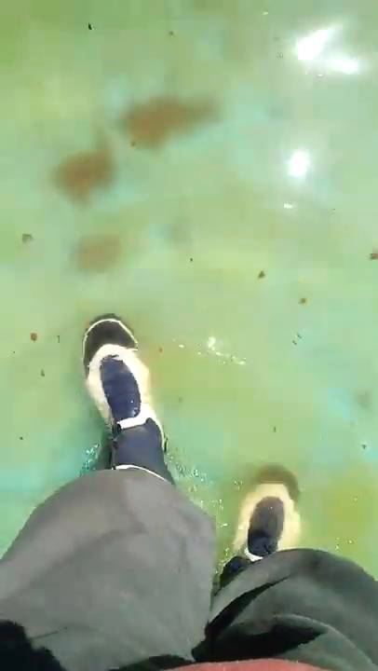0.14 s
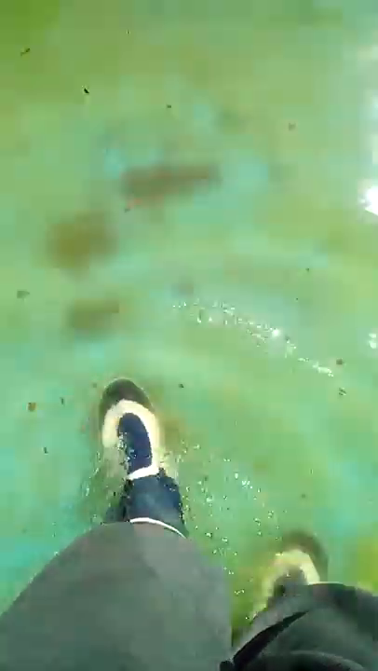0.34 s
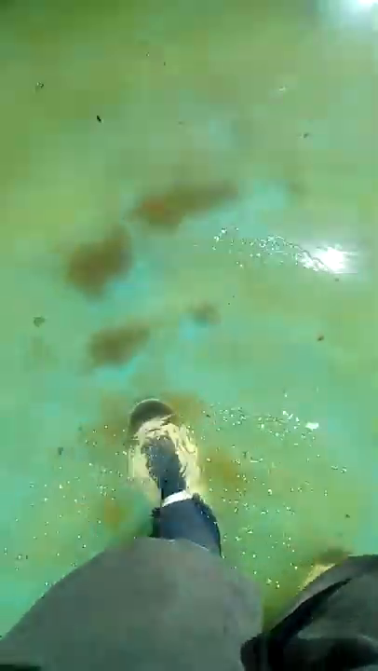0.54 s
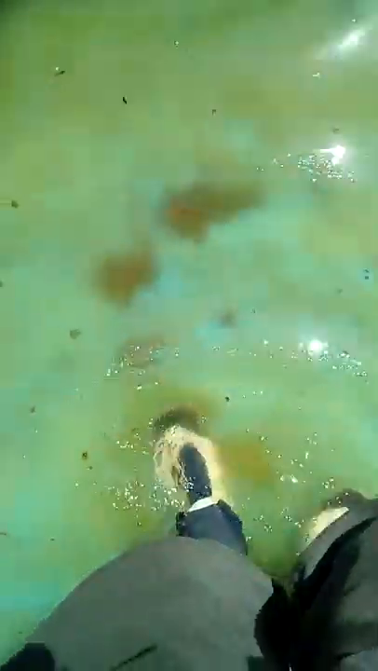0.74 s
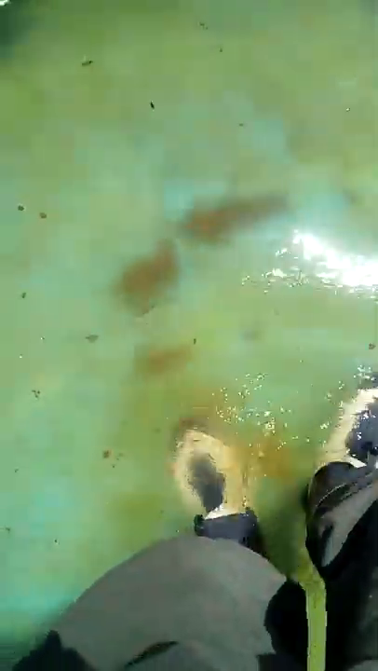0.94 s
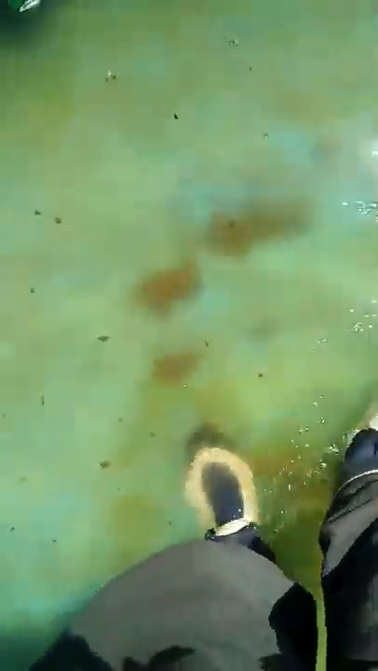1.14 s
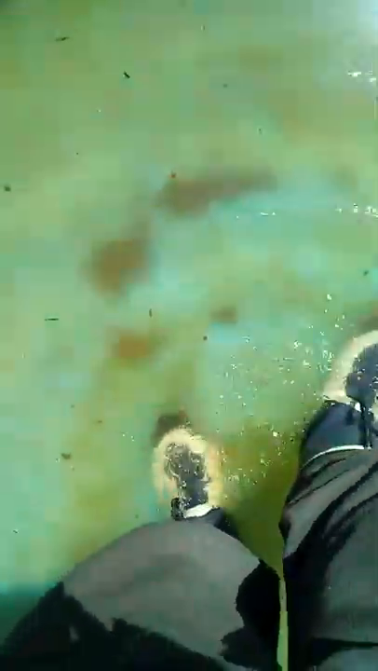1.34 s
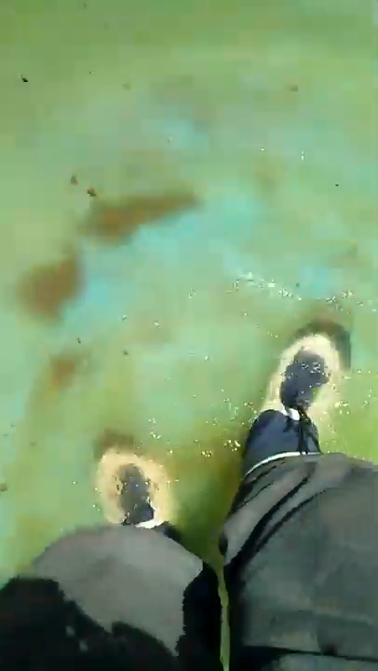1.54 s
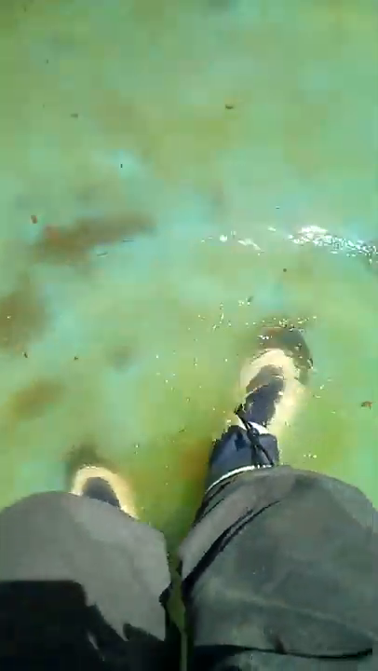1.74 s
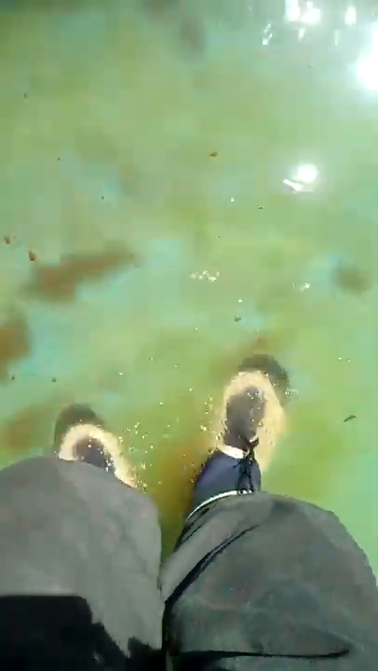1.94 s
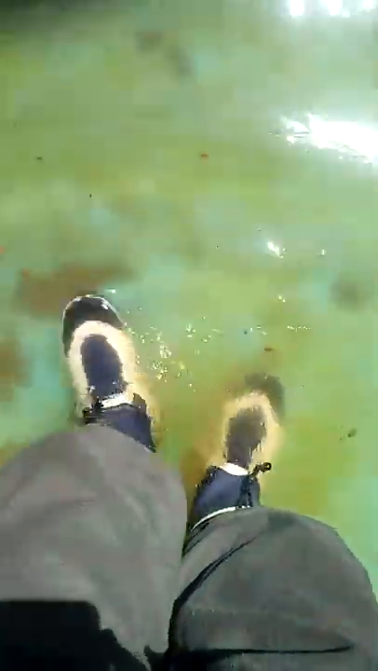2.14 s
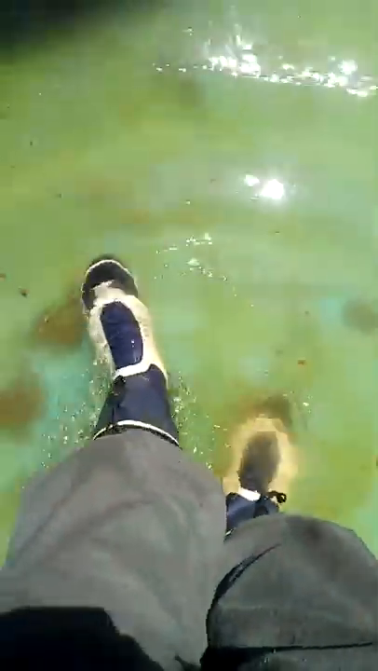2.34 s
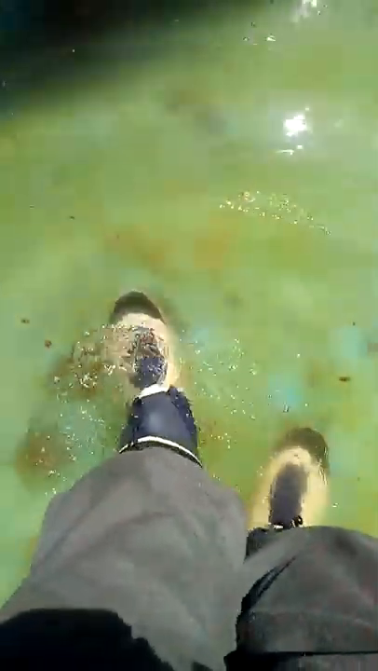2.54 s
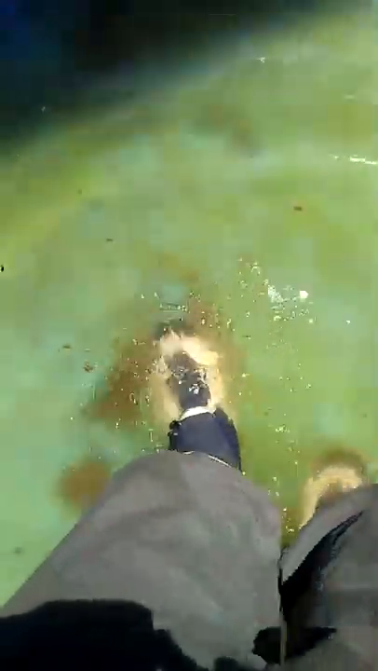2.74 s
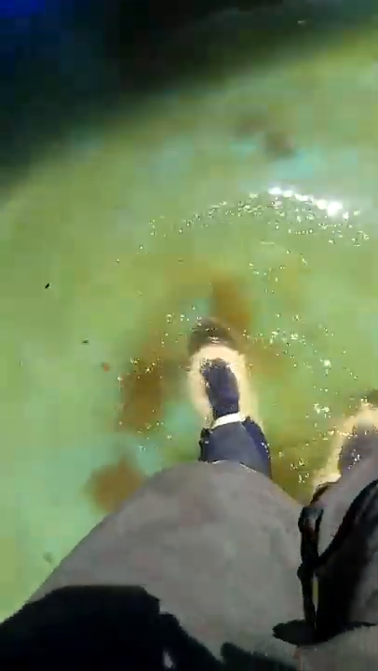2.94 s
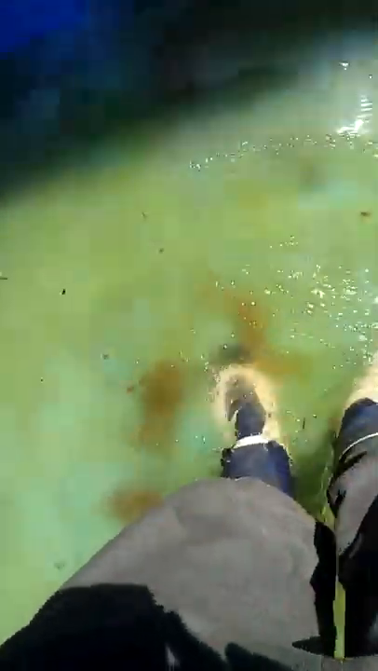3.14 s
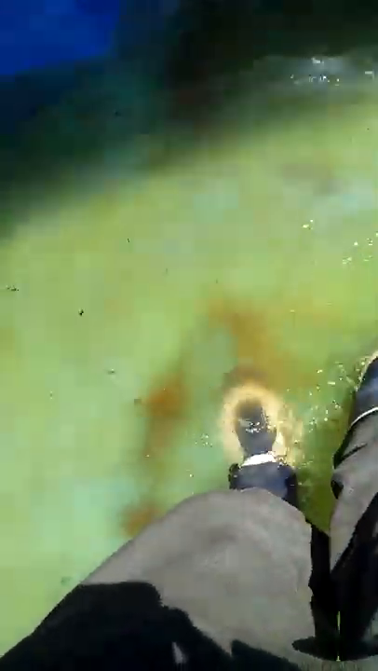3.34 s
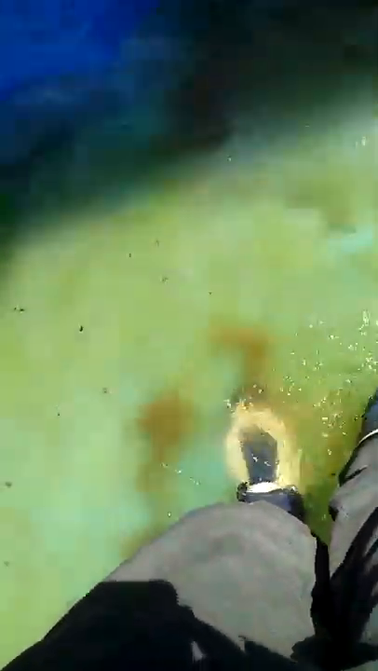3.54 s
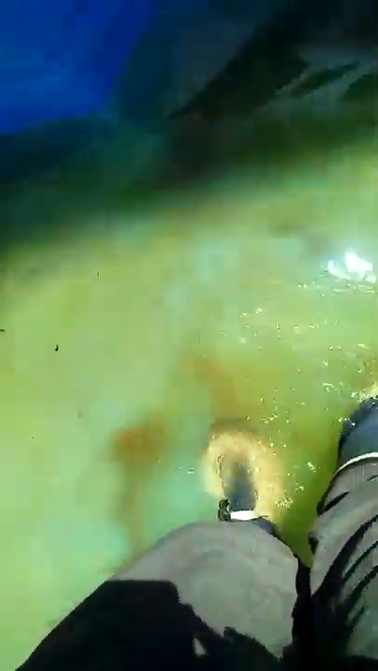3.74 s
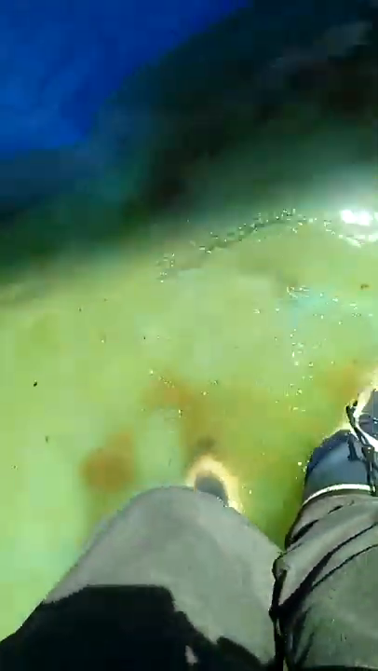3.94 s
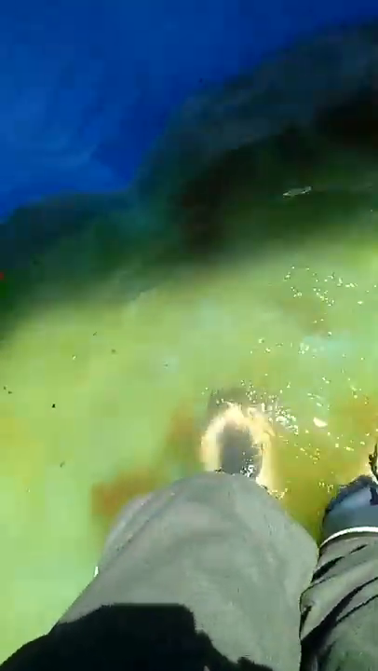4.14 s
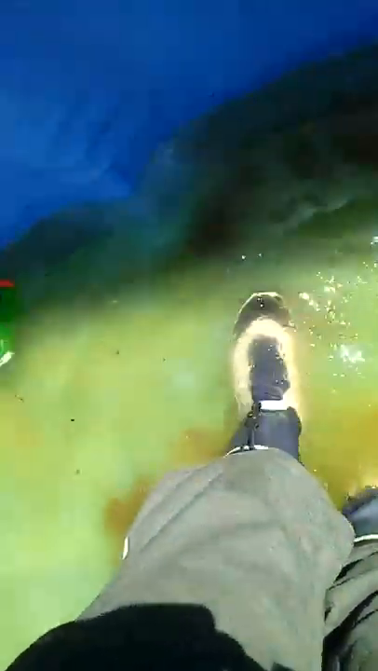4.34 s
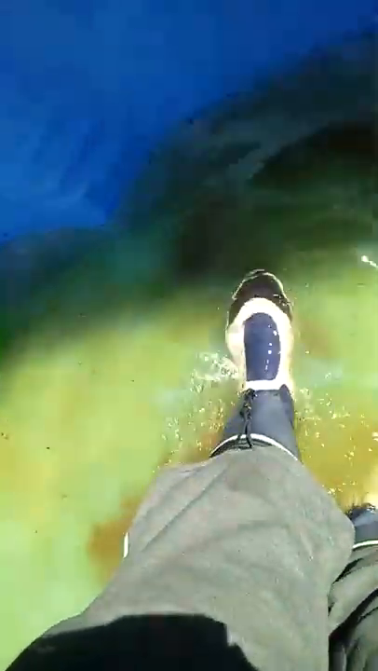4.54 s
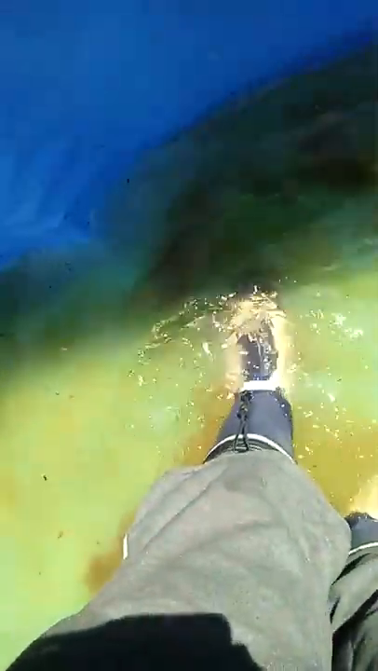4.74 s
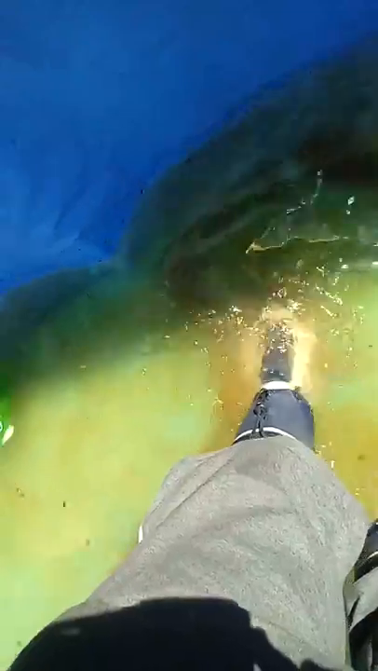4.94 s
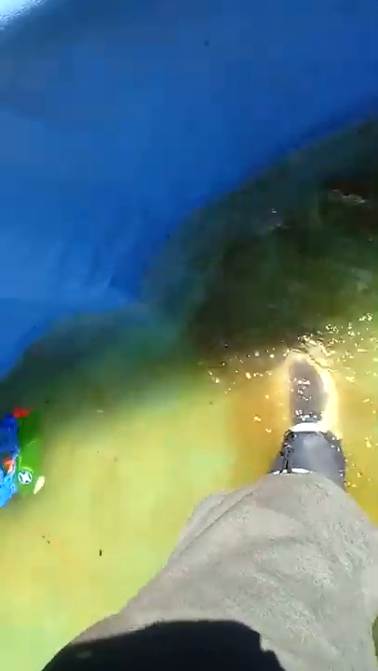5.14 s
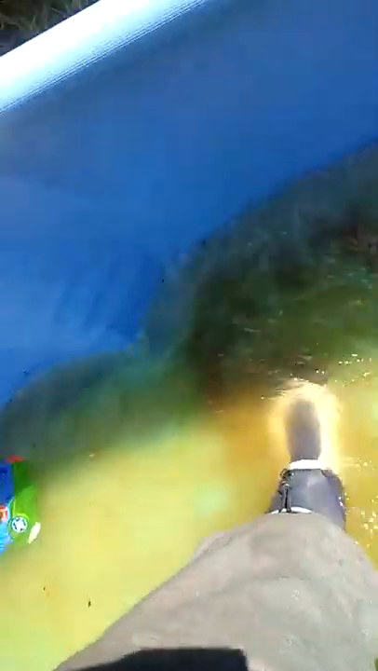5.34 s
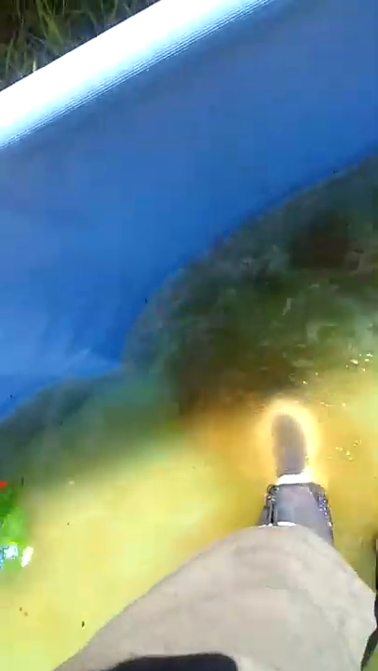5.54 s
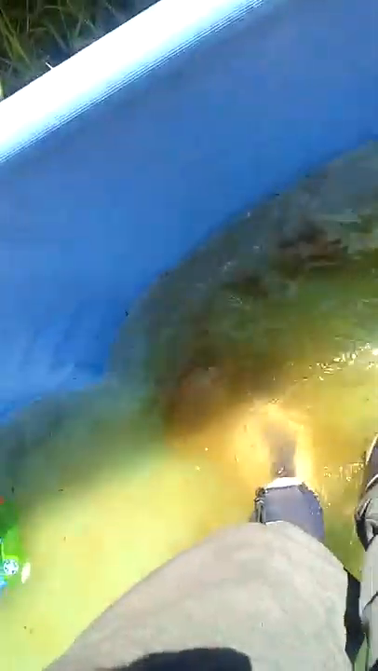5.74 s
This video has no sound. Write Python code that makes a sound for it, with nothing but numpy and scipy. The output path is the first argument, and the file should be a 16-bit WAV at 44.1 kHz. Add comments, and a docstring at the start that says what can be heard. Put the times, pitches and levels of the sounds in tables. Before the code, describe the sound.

Slow, uneven steps slosh through a shallow paddling pool, bubbling and splashing lightly over a faint outdoor hum.

```python
"""Rubber boots wade through a shallow paddling pool, heard from a small microphone held above them.
From the first step, trapped air rings: distinct bubbles one by one over a churn of fainter ones, while
droplets tick and wet cloth and water swish. Near 1.5 s comes a lull with a faint, narrow hiss.
The steps resume at 2.1 s, a sharp knock falls at 2.8 s, and the wading dies down after 5.3 s before a
last push. A quiet outdoor hum and the hiss of the microphone lie under it all."""
import sys
import numpy as np
from scipy import signal
from scipy.io import wavfile
from scipy.ndimage import uniform_filter1d

SR = 44100
rng = np.random.default_rng(int(sys.argv[2]) if len(sys.argv) > 2 else 0)


def wav_record(signal):
    """Record a signal, one row per channel, as 16-bit PCM in the file named by sys.argv[1]."""
    frames = np.transpose(np.atleast_2d(signal))
    bounded = np.clip(frames, -1, 1)
    # unit amplitude maps onto the largest positive 16-bit level
    quanta = np.round(bounded * 32767).astype(np.int16)
    wavfile.write(sys.argv[1], SR, quanta)


N = 259308

# colour of stirred water as heard through the small microphone's resonances: frequency_hz, relative_db
HEARD_COLOUR = [(200, -37.5), (560, -13.5), (760, 1), (1300, 1), (1550, -1.5), (2900, -12.5), (3900, -13.5),
                (4600, -16.5), (5600, -17), (6500, -17), (7300, -23), (8200, -45.5), (9900, -42.5),
                (12200, -62.5), (15300, -48)]


def ring(hz, length_s, rise, swell_s):
    """Damped oscillation: it swells, falls 60 dB in length_s and glides by the fraction rise."""
    t = np.arange(int(np.clip(length_s, 1e-3, .3) * SR)) / SR
    envelope = (1 - np.exp(-(t / swell_s) ** 2)) * gain_of(-60 * (t / length_s) ** 1.6)
    return envelope * np.sin(2 * np.pi * hz * t * (1 + rise * t / (2 * length_s)))


def loud_bubbles():
    """Minnaert resonance: trapped air is a spring, water its mass; the moving surface adds flutter."""
    # distinct bubbles: start_s, pitch_hz, level_db, swell_ms, length_ms, rise_fraction
    bubbles = [(0.0549, 1905, -37, 1.6, 35, 0.0), (0.1156, 1220, -27, 1, 7.8, 0.11),
               (0.138, 1080, -36.5, 1.6, 41, -0.039), (0.185, 1184, -29.5, 1.8, 49, 0.03),
               (0.2, 1460, -31, 3.5, 33, 0.049), (0.2098, 4030, -40, 0.83, 31, 0.3),
               (0.3146, 1396, -43, 0.94, 45, -0.08), (0.4715, 1700, -29, 0.37, 28, 0.016),
               (0.4766, 3750, -26, 0.4, 11, -0.1), (0.481, 1380, -27.5, 0.42, 15, -0.2),
               (0.4867, 1414, -29, 0.66, 40, -0.23), (0.6382, 1336, -26, 5.4, 19, 0.14),
               (0.9636, 1630, -41.5, 3.7, 64, -0.31), (1.0283, 477, -49.5, 2.3, 110, 0.067),
               (1.0285, 1470, -25.5, 2, 26, 0.0), (1.0661, 1560, -21, 3.7, 9.1, 0.2),
               (1.0756, 522, -49, 0.4, 100, -0.066), (1.0737, 1424, -24, 3.1, 13, 0.083),
               (1.121, 1314, -25.5, 0.97, 19, -0.035), (1.1755, 1290, -28, 1.8, 14, 0.0),
               (1.2004, 1319, -25.5, 1, 48, 0.18), (1.2039, 1050, -12.5, 2.3, 6.7, 0.42),
               (1.2134, 607, -40, 3.7, 55, -0.044), (1.2152, 1316, -21.5, 3.4, 24, -0.022),
               (1.227, 787, -39, 2.5, 61, -0.07), (1.2485, 1440, -22, 2.3, 8.5, 0.0),
               (1.2699, 606, -27, 8.4, 24, -0.085), (1.09, 1650, -28.5, 0.54, 9.8, -0.15),
               (1.185, 1715, -36, 2.9, 37, 0.04), (1.4029, 5599, -35.5, 4.5, 20, 0.08),
               (1.2771, 1373, -17.5, 7.1, 21.2, 0.0), (1.2893, 598, -35, 6.9, 60, 0.067),
               (2.1885, 1100, -23.5, 6.7, 44, 0.0), (2.2342, 1273, -26.5, 10.5, 28, 0.039),
               (2.2762, 605, -29, 11.5, 31, -0.03), (2.292, 644, -37, 1.2, 66, -0.02),
               (2.3101, 985, -36.5, 1.1, 190, -0.033), (2.3172, 1056, -17, 6.4, 19.3, 0.04),
               (2.3288, 1510, -31, 1.2, 51, -0.2), (2.3692, 1430, -20, 1.45, 9.6, 0.16),
               (2.3752, 980, -21.5, 4.8, 20, -0.0022), (2.4055, 2580, -29, 7.3, 21, 0.073),
               (2.4163, 1030, -25, 1.1, 6.4, 0.098), (2.4284, 5070, -24.5, 0.9, 4.3, 0.02),
               (2.4428, 656, -30, 3, 20, 0.06), (2.4469, 1750, -24, 1.2, 12.4, 0.015),
               (2.4499, 1129, -24, 1.5, 12, 0.05), (2.4564, 1030, -21, 5.7, 24, -0.11),
               (2.4683, 789, -30.5, 0.92, 50, -0.088), (2.4848, 867, -40, 3.3, 94, -0.03),
               (2.4984, 1305, -31.5, 2.3, 32, -0.022), (2.5316, 2770, -37, 4.4, 27, -0.011),
               (2.5838, 833, -36.5, 6, 54, -0.11), (2.6179, 2164, -21, 3.4, 8.9, 0.13),
               (2.6304, 911, -42, 0.72, 110, -0.07), (2.64, 818, -36.5, 1.6, 72, 0.073),
               (2.6581, 940, -19.5, 8.8, 21, 0.016), (2.6672, 914, -35, 4.9, 48, 0.02),
               (2.6947, 3750, -31.5, 3.6, 17, 0.02), (2.6954, 1688, -23.5, 3.9, 11, -0.08),
               (2.7224, 1170, -19, 12, 30, 0.34), (2.7619, 4070, -29.5, 0.84, 7.1, 0.034),
               (2.7743, 1017, -19, 12.4, 40, -0.066), (2.7938, 1023, -32.5, 5.5, 57, 0.028),
               (2.8325, 1840, -29.5, 7.8, 41, 0.01), (3.038, 2900, -42, 1.5, 15, 0.0),
               (3.091, 3500, -42, 1, 15, 0.0), (3.1058, 2850, -25.5, 1.5, 4.4, -0.013),
               (3.205, 1250, -38, 5, 30, 0.3), (3.2742, 1306, -22.5, 7.1, 21, -0.039),
               (3.2871, 1750, -36, 1.1, 36, 0.0058), (3.338, 1277, -35, 3.2, 60, -0.094),
               (3.3514, 477, -49, 1, 72, -0.16), (3.3518, 1670, -20, 4.3, 12, 0.14),
               (3.3582, 2200, -28.5, 1.7, 14, -0.072), (3.3829, 1940, -20, 1.5, 6, -0.05),
               (3.3993, 1015, -32, 0.88, 29, 0.068), (3.4004, 6566, -26, 2.2, 6.1, 0.07),
               (3.4752, 5986, -27.5, 4.6, 10.4, 0.06), (3.4082, 992, -17, 9.6, 28, 0.17),
               (3.4249, 486, -40, 4.7, 48, -0.028), (3.4302, 1343, -12.5, 6.5, 19, 0.069),
               (3.4397, 967, -29, 0.3, 44, -0.06), (3.4496, 1284, -31.5, 1.2, 28, 0.04),
               (3.4533, 836, -30, 1.2, 15, 0.04), (3.5181, 2890, -25.5, 2.1, 9.1, -0.01),
               (3.5685, 5940, -21, 2.4, 6.3, -0.037), (3.5895, 1295, -19, 5.8, 21, 0.084),
               (3.5959, 1220, -13, 3.4, 11.6, 0.14), (3.6655, 2090, -20.5, 3.6, 10.7, 0.092),
               (3.6693, 962, -29, 0.24, 72, -0.024), (3.6885, 958, -20, 11, 25, 0.03),
               (3.7267, 1750, -28.5, 4.6, 18, 0.08), (3.7809, 1830, -28.5, 2.7, 10, -0.04),
               (3.8091, 642, -38.5, 3.4, 60, -0.052), (3.8301, 712, -37.5, 8.6, 48, 0.11),
               (3.8442, 4960, -32, 4.5, 14, 0.014), (3.8632, 735, -26, 5, 12, 0.18),
               (3.8907, 1760, -36, 2, 14, 0.03), (4.4455, 1145, -39, 0.5, 22, 0.069),
               (4.4512, 3590, -39.5, 1.8, 21, -0.04), (4.5096, 3550, -31.5, 3.1, 13, 0.0),
               (4.5229, 6580, -19, 1.46, 6, -0.02), (4.524, 3050, -26.5, 3.8, 11.6, -0.07),
               (4.533, 949, -36.5, 0.44, 68, 0.32), (4.5452, 1108, -29.5, 4.0, 27, -0.09),
               (4.5548, 3627, -10.5, 1.02, 2.97, 0.018), (4.579, 3930, -20.5, 1.8, 6.1, -0.03),
               (4.5811, 1910, -22, 4.4, 13.5, -0.059), (4.644, 1620, -31.5, 1.2, 14, -0.036),
               (4.6542, 1035, -14.5, 6, 19.4, 0.1), (4.6835, 608, -27.5, 24, 72, 0.22),
               (4.6918, 795, -29.5, 0.95, 38, 0.14), (4.6984, 2940, -33.5, 4.2, 21, 0.03),
               (4.7003, 1000, -14.5, 5.4, 11.2, 0.033), (4.7472, 3270, -17.5, 3.3, 11.3, 0.063),
               (4.7964, 1480, -15.6, 7.3, 20, 0.12), (4.7979, 1136, -28, 0.97, 35, 0.023),
               (4.8076, 1444, -23.5, 1.4, 26, 0.12), (4.8197, 1105, -21.5, 0.89, 13, -0.47),
               (4.8197, 3678, -25, 1, 7, 0.0), (4.8496, 1520, -8.5, 2.5, 9.6, 0.028),
               (4.8536, 1060, -17.5, 1.2, 12.7, -0.19), (4.8586, 1350, -24, 0.19, 18, 0.07),
               (4.8629, 491, -41, 0.63, 76, 0.01), (4.9077, 1820, -29.5, 2.2, 21, 0.0096),
               (4.9443, 1187, -44, 0.8, 65, 0.07), (4.9749, 1225, -17.5, 4.8, 12, 0.027),
               (4.9808, 1479, -28.5, 5.2, 18, 0.0), (5.0215, 1212, -38.5, 2.7, 23, -0.13),
               (5.1085, 6940, -26, 2.7, 6.1, -0.062), (5.121, 1956, -33, 1.3, 37, -0.049),
               (5.1228, 3810, -19, 1.7, 6.2, 0.07), (5.1272, 2350, -22.9, 3.2, 11, 0.1),
               (5.1471, 1950, -32.5, 0.72, 17, -0.02), (5.1563, 3380, -23, 2.2, 6.5, -0.046),
               (5.1577, 920, -20, 5.4, 22.6, 0.0078), (5.1693, 1008, -35, 2.9, 50, 0.0),
               (5.2567, 3140, -42, 0.3, 14, 0.0), (5.2704, 3520, -47, 0.78, 35, 0.059),
               (5.4019, 6740, -23.5, 1.44, 5.2, -0.2), (5.412, 2105, -51, 2, 39, 0.014),
               (5.8134, 1680, -40, 1.84, 24, -0.089), (5.8493, 354, -49, 1.1, 52, 0.32),
               (5.8508, 1660, -34.5, 3.7, 32, 0.018)]
    out = np.zeros(N)
    for start_s, hz, db, swell_ms, length_ms, rise in bubbles:
        add(out, start_s, gain_of(db) * ring(hz, length_ms / 1000, rise, swell_ms / 1000))
    return out * (1 + .34 * fluctuation(samples=90))


def bubble_crowd(db, low_hz, high_hz, cycles, per_s, spread_db, swish_share, pitches=40):
    """Incoherent addition: faint bubbles at random times and a smooth swish sum in power in one band."""
    calm_db = 22.5  # this far below the peak level only swish remains
    activity = np.clip(1 + (db - db.max()) / calm_db, 0, 1)
    births = impulses(activity * per_s, spread_db, cap=4) * gain_of(db)
    pitch_index = rng.integers(0, pitches, N)
    ringing = np.zeros(N)
    for k, hz in enumerate(np.geomspace(low_hz, high_hz, pitches)):
        stretch, rise, softness = rng.random(3)
        length_s = cycles * (.5 + 2 * stretch) / hz
        bubble = ring(hz, length_s, .5 * rise, length_s * (.024 + .2 * softness))
        weight = gain_of(level_at(HEARD_COLOUR, hz)) * np.sqrt(hz) / np.linalg.norm(bubble)
        ringing += signal.oaconvolve(births * (pitch_index == k), weight * bubble)[:N]
    ringing *= np.linalg.norm(gain_of(db) * np.sqrt(activity)) / np.linalg.norm(ringing)
    swish = gain_of(db) * noise(HEARD_COLOUR, low_hz, high_hz)
    bubble_share = 1 - swish_share
    return np.sqrt(bubble_share) * ringing + np.sqrt(1 - bubble_share * activity) * swish


def stirring_db():
    """Powers add: boot pushes over still ripples set the gurgle, slosh, trickle and spray levels."""
    # pushes of a boot, fading 30 dB in fade_s (a negative fade holds to the end):
    # start_s, rise_s, hold_s, fade_s, gurgle_db, slosh_db, trickle_db, spray_db
    pushes = [(0.0, .03, .04, .1, -56, -75, -56, -66), (0.03, .06, .21, .3, -48, -63.5, -58.5, -67.5),
              (0.449, 0.024, 0.071, 0.18, -51, -72, -55, -59.5),
              (0.862, 0.028, .04, 0.3, -61, -76, -66.5, -90),
              (0.938, 0.075, 0.13, 0.48, -47.5, -66, -54.5, -61),
              (1.137, 0.043, 0.088, 0.226, -41.5, -59, -50.5, -58),
              (1.316, 0.022, 0.14, .1, -58, -71.5, -67, -61),
              (2.099, .1, .15, 1.2, -52.5, -57.5, -69, -62.5), (2.26, .03, .1, .1, -60, -70, -62, -64),
              (2.35, .07, .11, 0.29, -41.5, -54.5, -48, -53),
              (2.558, 0.029, 0.19, .15, -46, -66.5, -62, -61),
              (2.8, .03, 0.055, 0.13, -52.5, -63, -78, -76),
              (3.049, 0.038, 0.15, 0.4, -54.5, -72, -61.5, -77),
              (3.253, 0.098, 0.099, 0.25, -42.5, -57, -55, -56),
              (3.492, 0.064, 0.13, 0.33, -46.5, -73, -52, -57),
              (3.735, 0.036, .17, .12, -53, -63.5, -58, -67.5),
              (4.212, 0.067, 0.16, 1, -68.5, -73, -77, -68),
              (4.434, 0.081, 0.094, 0.28, -50, -66, -51.5, -55),
              (4.619, 0.039, 0.097, 0.1, -50.5, -56.5, -56, -60),
              (4.779, 0.017, 0.061, 0.18, -45.5, -58, -48.5, -58.5),
              (4.88, .02, 0.091, 0.02, -52, -60, -62, -66.5),
              (5.09, 0.023, 0.17, 0.18, -57, -67, -57, -67.5),
              (5.783, 0.044, .1, -7, -52.5, -63, -58.5, -90)]
    # ripples between steps: gurgle_db, slosh_db, trickle_db, spray_db
    ripples = (-64, -72, -72, -79)
    t = np.arange(0, N / SR + .01, .005)
    power = np.outer(gain_of(ripples) ** 2, np.ones(len(t)))
    for start, rise, hold, fade, *levels_db in pushes:
        rising = 1 - (t - start) / rise
        fading = (t - start - rise - hold) / fade
        below_db = 30 * np.maximum(0, np.maximum(rising, fading))
        power += gain_of(np.array(levels_db)[:, None] - below_db) ** 2
    return [np.interp(np.arange(N) / SR, t, 10 * np.log10(band)) for band in power]


def churn():
    """Pitch varies inversely with radius: as bubble sizes drift, so do the peaks of trickle and spray."""
    # gurgle, slosh, trickle, spray and mist:
    # low_hz, high_hz, ring_cycles, peak_bubbles_per_s, spread_db, swish_share
    crowds = [(603.5, 2200, 18.8, 500, 3.5, 0.5), (360, 620, 16.4, 150, 1, 0.61),
              (2200, 4800, 8, 600, 4.5, 0.55), (4560, 8200, 8, 500, 4.5, 0.45),
              (8170, 12000, 7, 300, 4, 0.3)]
    # pitch of the prevailing bubble size: time_s, trickle_hz, spray_hz
    peaks = [(0.0, 3030, 6400), (0.15, 2200, 5500), (0.2, 3700, 5840), (0.39, 2270, 6090),
             (0.46, 3840, 5840), (0.65, 2800, 5340), (1.23, 2710, 5930), (1.37, 3340, 5680),
             (1.64, 2250, 5480), (2.47, 2910, 5820), (2.65, 2410, 6380), (2.69, 3750, 5620),
             (2.8, 3970, 4980), (2.85, 2510, 5760), (3.19, 3500, 5210), (3.34, 2250, 6860),
             (3.49, 2830, 5930), (3.96, 2460, 6040), (4.08, 3130, 5430), (4.32, 2570, 6360),
             (4.47, 3520, 6210), (4.77, 3250, 5570), (4.96, 2260, 5600), (5.29, 3460, 5910),
             (5.4, 2380, 6110), (5.88, 2900, 5220)]
    gurgle_db, slosh_db, trickle_db, spray_db = stirring_db()
    mist_db = -77.5 + .6 * (spray_db - spray_db.max())
    levels = (gurgle_db, slosh_db, trickle_db, spray_db, mist_db)
    gurgle, slosh, trickle, spray, mist = (bubble_crowd(db, *row) for db, row in zip(levels, crowds))
    times, trickle_hz, spray_hz = np.transpose(peaks)
    treble = mist
    for band, peak_hz, width_hz in ((trickle, trickle_hz, 680), (spray, spray_hz, 540)):
        centre_hz = np.interp(np.arange(N) / SR, times, peak_hz)
        treble = treble + .5 * band + gain_of(-1.5) * resonate(band, centre_hz, width_hz)
    flicker_db = 2.2 * fluctuation(samples=200)  # spatter makes the whole treble flicker together
    return gurgle + slosh + unit_rms(gain_of(flicker_db)) * treble


def droplet_ticks():
    """A brief pulse has a broad spectrum: a droplet bursts or lands as a puff of noise in faint spray."""
    # single droplets: time_s, treble_db, lower_re_treble_db, top_re_treble_db
    droplets = [(0.0203, -54, 1.5, -29), (0.062, -65, 9, -17), (0.339, -73.5, 18, -9),
                (0.482, -53.5, 14.5, -22), (0.5078, -69, 25, -12), (0.6136, -73, 9, -19),
                (1.0065, -67, 11, -22), (1.0566, -62, 9, -34), (1.2159, -67, 15, -11),
                (1.346, -55, 9.5, -16), (1.354, -64, 6, 1), (1.388, -59, 4, -12), (2.1764, -53, -6, -32),
                (2.386, -60, -2, -14), (2.4224, -56, 10, -15), (2.4515, -73, 35, -9), (2.5068, -63, 9, -21),
                (2.5877, -59, 17, -30), (2.65, -61, 7, -13), (2.729, -56, 0, -27), (2.7716, -68, 23, 7),
                (2.8726, -70, 0, -18), (2.8965, -70, 8, -18), (3.0085, -72, 12, -10),
                (2.9584, -66, -17, -19.5), (3.0245, -52.5, 6.5, -5), (3.3032, -53.5, 0.5, -23),
                (3.3124, -66, -1, -10), (3.343, -55, -17, -32), (3.361, -56, 4, -19),
                (3.4483, -53.5, 10, -28), (3.5215, -49, 0, -22), (3.5554, -58, -3, -18),
                (3.5932, -61, 6, -26), (3.6308, -46, -4, -46), (3.645, -50, -12, -45),
                (3.805, -60, -19.5, -28), (3.8477, -56, 2.5, -37), (3.915, -66, -4, -9),
                (4.4012, -71, 15, -2), (4.5248, -47.5, 14, -24), (4.5399, -59, 18.5, -12),
                (4.6268, -57.5, 18.5, -11), (4.6415, -57, 20, -12), (4.748, -56.5, 12, -20),
                (4.8172, -49, 12.5, -3), (4.823, -57, 14, -11), (5.1098, -57, 20, -2),
                (5.1242, -48, 14.5, -10), (5.1527, -57.5, 3, -6), (5.232, -70, -0.5, -16),
                (5.3396, -71, 8, 3.5)]
    # treble, lower and top bands of a tick: low_hz, high_hz
    bands = [(7500, 12000), (3000, 7500), (12000, 15800)]
    hisses = [noise(HEARD_COLOUR, *edges) for edges in bands]
    t = np.arange(-600, 1000) / SR
    spray = gain_of(-14) * np.where(t < 0, np.exp(t / .004), np.exp(-t / .006))
    envelope = np.exp(-(t / .0012) ** 2) + spray
    envelope_rms = np.sqrt(np.mean(envelope ** 2))
    out = np.zeros(N)
    for time_s, treble_db, lower_db, top_db in droplets:
        span = np.round((time_s + t) * SR).astype(int) % N
        for offset_db, hiss in zip((0, lower_db, top_db), hisses):
            puff = envelope_rms * unit_rms(envelope * hiss[span])
            add(out, time_s + t[0], gain_of(treble_db + offset_db) * puff)
    return out


def spatter():
    """Shot noise: tiny droplets fall at random, each a blink of treble, louder when the spray is."""
    # colour of the fine spatter: frequency_hz, relative_db
    spectrum = [(1800, -16), (3000, -1), (5000, -2), (7000, -7), (8500, -20), (11000, -26), (13000, -45),
                (16000, -45)]
    impacts = impulses(per_s=70, spread_db=4, cap=3)
    t = np.arange(-200, 600) / SR
    blink = np.exp(-(t / .0012) ** 2) + .15 * (t > 0) * np.exp(-abs(t) / .004)
    drops = unit_rms(signal.oaconvolve(impacts, blink, "same") * noise(spectrum, low_hz=1500))
    spray_db = stirring_db()[-1]
    return gain_of(-65 + .85 * (spray_db - spray_db.max())) * drops


def reflections(x, level_db=-10, t60_s=.045):
    """Early reflections: the water surface and pool wall return delayed copies that die away fast."""
    delays = np.arange(80, 4000, 20) + rng.integers(0, 20, 196)
    response = np.zeros(4096)
    response[delays] = rng.choice([-1., 1.], len(delays)) * gain_of(-60 * delays / SR / t60_s)
    return gain_of(level_db) * signal.oaconvolve(x, response / np.linalg.norm(response))[:N]


def knocks(knock_s=2.7706, knock_db=-21.5):
    """Impulse excitation: bumps on the hand-held microphone and the knock's low thump do not ring; the sharp
    knock itself briefly does."""
    # dull bumps, mostly handling of the microphone, plus the low thump under the knock at 2.77 s: start_s,
    # level_db, length_ms
    bumps = [(0.468, -58.5, 10), (0.519, -51, 13), (0.758, -62, 12), (2.7721, -41, 4), (3.65, -58, 11),
             (4.87, -64, 15), (5.099, -59, 14)]
    # modes of the sharp knock: pitch_hz, relative_db, length_ms
    modes = [(1100, 0, 2.5), (4300, -3, 2.5)]
    out = np.zeros(N)
    for start_s, db, length_ms in bumps:
        age = np.arange(int(length_ms / 1000 * SR)) / SR / (length_ms / 8000)  # in time constants
        add(out, start_s, gain_of(db) * age * (2 - age) * np.exp(1 - age))
    for hz, db, length_ms in modes:
        add(out, knock_s, gain_of(knock_db + db) * ring(hz, length_ms / 1000, rise=0, swell_s=1.6e-4))
    microphone_bass_cut = signal.butter(2, 90, "high", fs=SR, output="sos")
    return signal.sosfilt(microphone_bass_cut, out)


def narrow_hiss(width_hz=250):
    """Resonant filtering: noise in one narrow, drifting band sounds faintly between two steps."""
    # course of the hiss: time_s, level_db, centre_hz
    course = [(1.5, -72.5, 2200), (1.546, -79, 2250), (1.614, -64, 2290), (1.794, -69, 2230),
              (1.804, -78, 2300), (1.942, -69, 2320), (2.08, -75, 2280)]
    times, db, hz = np.transpose(course)
    t = np.arange(times[0], times[-1], 1 / SR)
    centre_hz = np.interp(t, times, hz)
    band = resonate(rng.standard_normal(len(t)), centre_hz, width_hz)
    band = resonate(band, centre_hz, width_hz)
    envelope = gain_of(np.interp(t, times, db)) * signal.windows.tukey(len(t), .2)
    out = np.zeros(N)
    add(out, times[0], envelope * unit_rms(band))
    return out


def noise_floor():
    """Stationary noise: the outdoor hum and the hiss of the microphone keep a steady spectrum."""
    # spectral density of hum and hiss: frequency_hz, relative_db
    spectrum = [(20, -5.5), (45, -18.5), (120, -14.5), (195, -13.5), (323, -8), (506, -9), (800, 0),
                (1000, -2), (1560, -20), (2660, -18), (5830, -26.5), (8410, -39.5), (13600, -36.5),
                (15200, -25), (16500, -38)]
    return gain_of(-60) * noise(spectrum, patchy_db=1, size=4096)


def noise(spectrum, low_hz=0, high_hz=SR, patchy_db=4.5, size=512):
    """Spectral shaping: random short-time spectra take a given colour, with drifting patches."""
    frames = 4 * N // size + 9
    hz = np.fft.rfftfreq(size, 1 / SR)
    real, imaginary, patches = rng.standard_normal((frames, len(hz), 3)).T
    patches = uniform_filter1d(patches, size=3, axis=0)  # across frequency
    patches = unit_rms(uniform_filter1d(patches, size=18, axis=1))  # across time
    colour = gain_of(level_at(spectrum, hz)[:, None] + patchy_db * patches)
    in_band = (hz >= low_hz) & (hz < high_hz)
    spectra = (real + 1j * imaginary) * colour * in_band[:, None]
    return unit_rms(signal.istft(spectra, nperseg=size, noverlap=3 * size // 4)[1][:N])


def resonate(x, hz, width_hz):
    """Heterodyning: shifting the curve hz to zero, smoothing and shifting back gives a moving resonance."""
    carrier = np.exp(2j * np.pi * np.cumsum(hz) / SR)
    pole = np.exp(-np.pi * width_hz / SR)
    return 2 * (carrier * signal.lfilter([1 - pole], [1, -pole], x / carrier)).real


def impulses(per_s, spread_db, cap):
    """Poisson process: independent impulses of random level, at most cap times spread_db."""
    strength = gain_of(spread_db * np.minimum(rng.exponential(1, N), cap))
    return strength * (rng.random(N) < per_s / SR)


def fluctuation(samples):
    """Low-pass noise: two moving averages leave a random wavering of rms 1."""
    return unit_rms(uniform_filter1d(uniform_filter1d(rng.standard_normal(N), samples), samples))


def level_at(spectrum, hz):
    """Interpolates a spectrum on a log-frequency axis."""
    frequencies, db = np.transpose(spectrum)
    return np.interp(np.log(hz + 1), np.log(frequencies + 1), db)


def gain_of(db):
    """Decibels to amplitude."""
    return 10 ** (np.asarray(db) / 20)


def unit_rms(x):
    """Scales to rms 1."""
    return x / np.sqrt(np.mean(x ** 2) + 1e-20)


def add(mix, start_s, sound):
    """Superposes a sound on the mix from start_s."""
    part = mix[round(start_s * SR):][:len(sound)]
    part += sound[:len(part)]


def scene():
    """Superposition: water, its reflections, droplets, knocks and background sum in one channel."""
    water = loud_bubbles() + churn() + spatter()
    background = noise_floor() + narrow_hiss()
    return (water + reflections(water) + droplet_ticks() + knocks() + background)[None]


def record(dry, cutoff_hz=15900):
    """Band limiting: a steep low-pass filter removes the highest treble."""
    low_pass = signal.firwin(511, cutoff_hz, window=("kaiser", 9), fs=SR)
    return signal.oaconvolve(dry, low_pass[None], "same")


dry = scene()
out = record(dry)
wav_record(out)
```